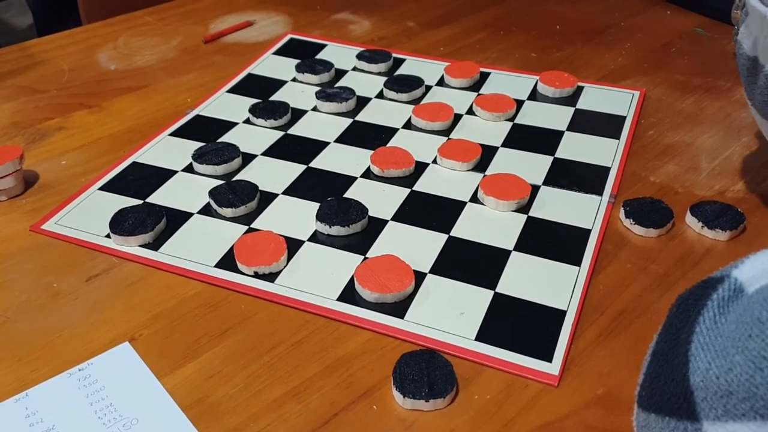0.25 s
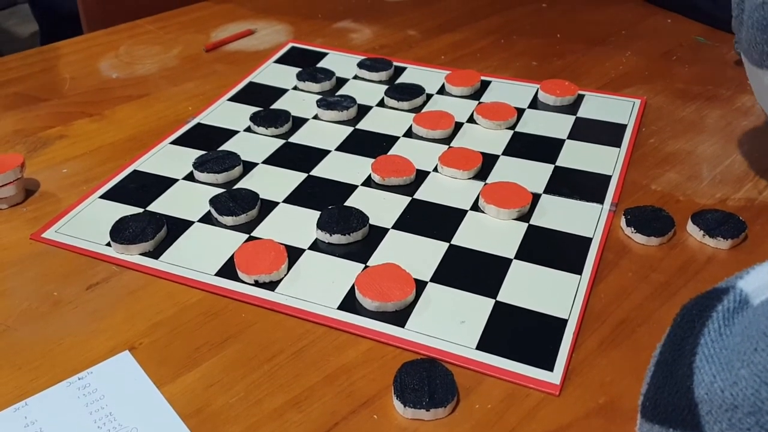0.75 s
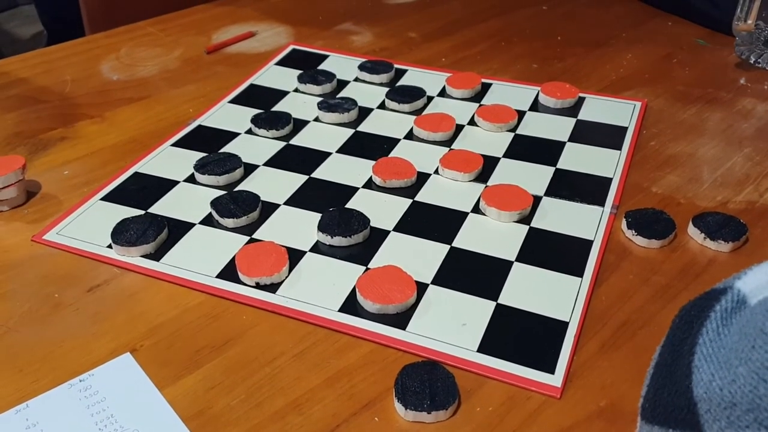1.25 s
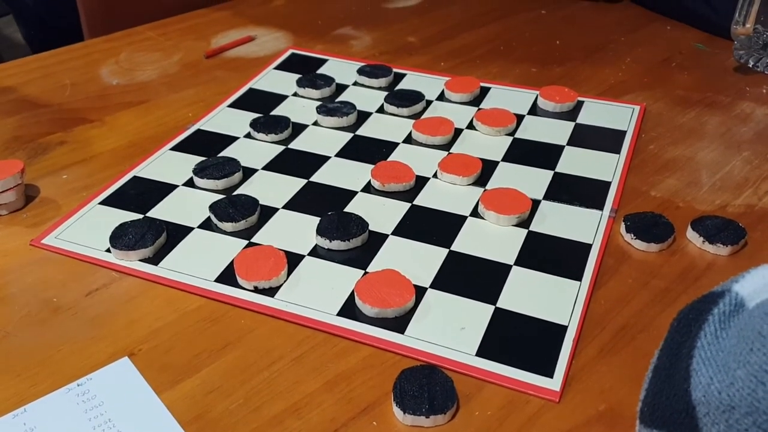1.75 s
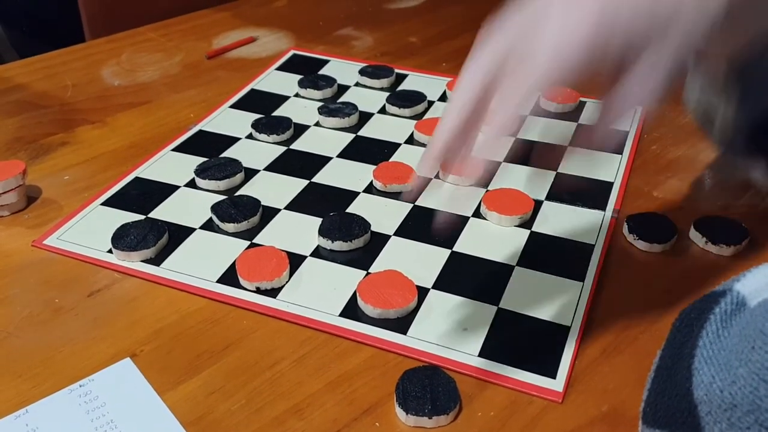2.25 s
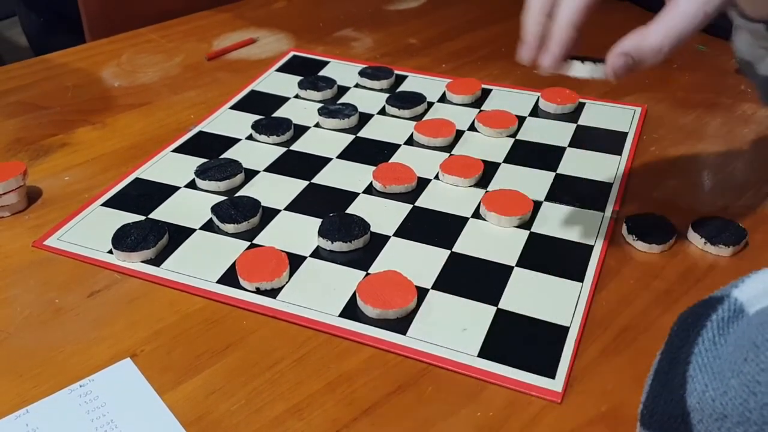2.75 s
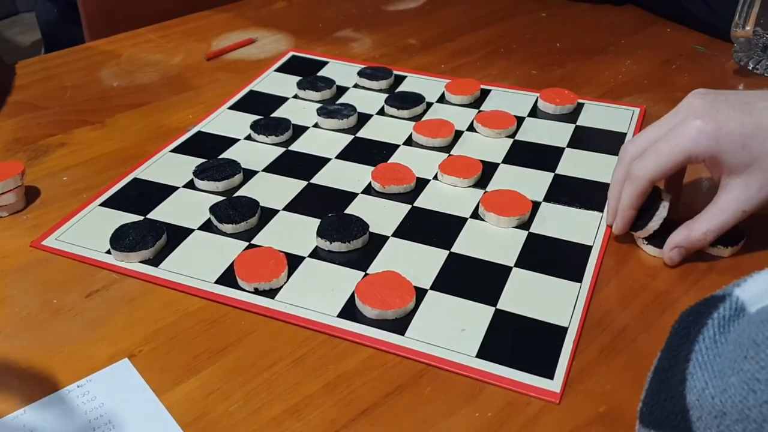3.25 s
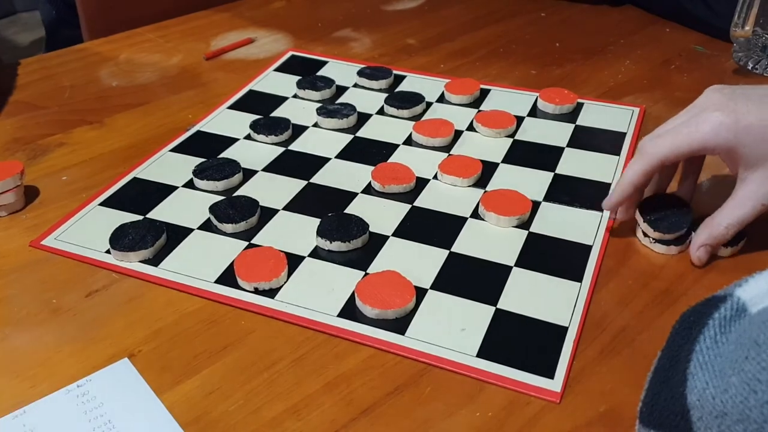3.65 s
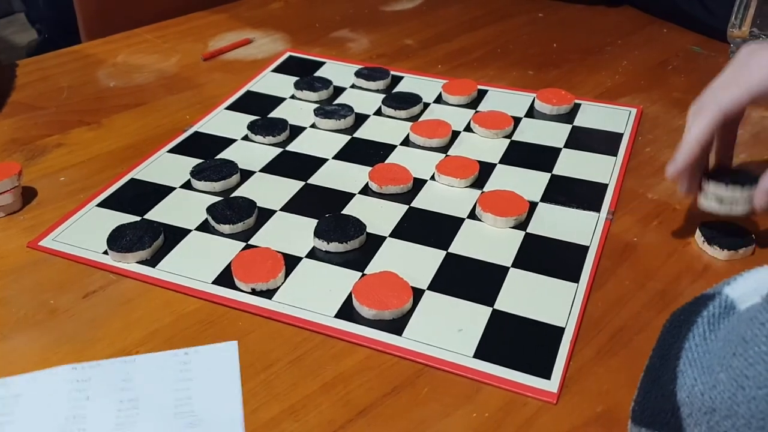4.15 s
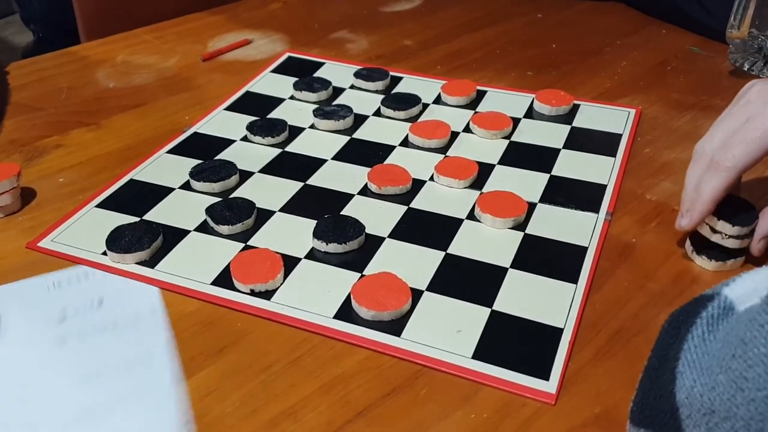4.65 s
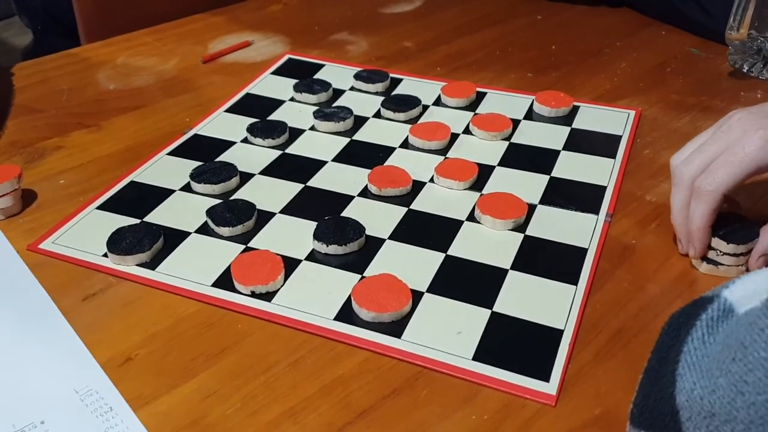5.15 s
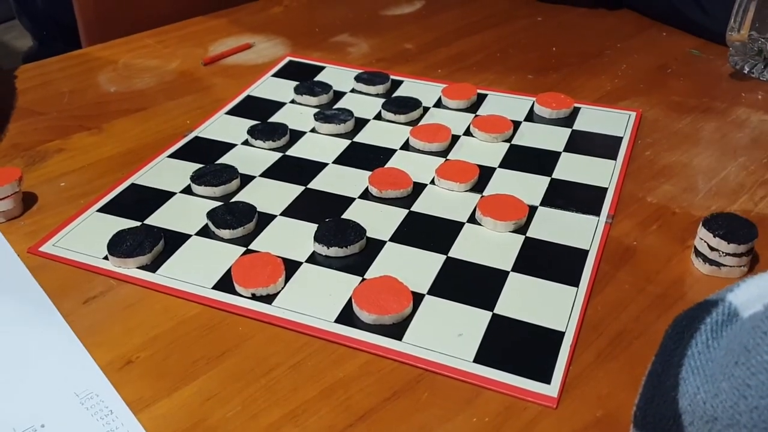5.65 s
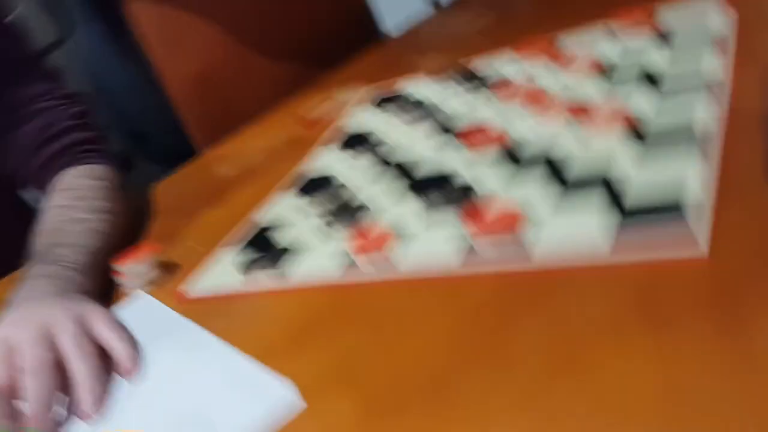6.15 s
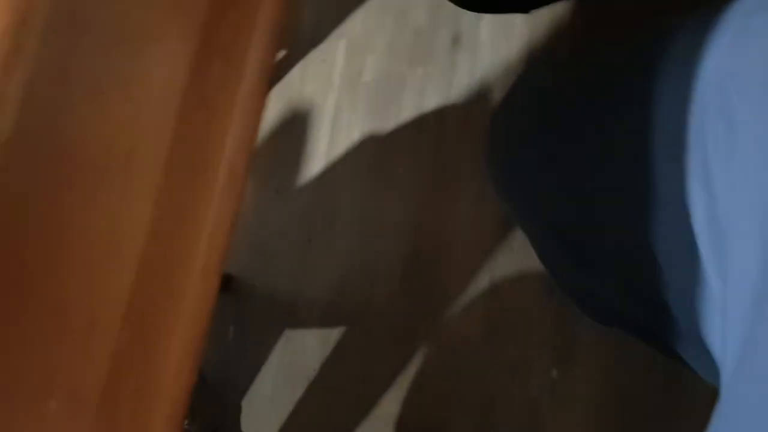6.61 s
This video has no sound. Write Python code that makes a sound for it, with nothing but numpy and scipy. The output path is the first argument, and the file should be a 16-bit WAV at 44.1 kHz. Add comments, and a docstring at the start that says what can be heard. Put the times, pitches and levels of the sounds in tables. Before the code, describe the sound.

Light wooden discs clack together and tap down on wood, followed by close paper crackling and loud, low handling bumps over faint room hum.

```python
"""A small living room: from the start, wooden draughts pieces ring as they click, slide and knock on the table.
Each is a noisy blow through resonances, heard direct and off the walls; low thuds ring the table's modes.
Then paper, loudest at the right microphone, crinkles: runs of snaps over random crackle in resonant patches.
Near the end fingers thump and rub the recorder's left port as pressure pulses, and the background sinks.
Beneath lie coloured room noise and hiss, brief very high hisses, and a low hum that fades shortly before the end."""
import sys
import numpy as np
from scipy import signal
from scipy.fft import rfft, irfft
from scipy.io import wavfile
from scipy.ndimage import uniform_filter1d

SR = 44100
rng = np.random.default_rng(int(sys.argv[2]) if len(sys.argv) > 2 else 0)


def transcribe(signal):
    """Save signal, clipped to [-1, 1], as a 16-bit WAV file at the path in sys.argv[1]."""
    frames = np.atleast_2d(signal).T
    limited = np.clip(frames, -1, 1)
    pcm = np.round(limited * 32767).astype(np.int16)
    wavfile.write(sys.argv[1], SR, pcm)


N = 303408
TIME = np.arange(N) / SR
BLOW_TIME = TIME[:4096]   # time within one blow [s]

# Levels and spectra are relative: the mix sets the final gain.
# disc against disc: (time [s], peak [dB], ring [Hz], twice the left-right difference [dB])
DISC_CLICKS = [(0.0818, -9.5, 3080, 17), (0.2098, -17, 3220, -25), (0.2143, -15.5, 3100, 9),
               (0.2515, -27, 3620, 2), (0.342, -34, 3100, 11), (0.352, -29, 4960, -14),
               (0.3662, -18.5, 1710, -27), (0.374, -13, 3670, 7), (0.3875, -23, 5030, -23),
               (0.428, -18.5, 2540, -33), (0.449, -14, 6000, -28), (0.4616, -16.5, 3620, -26),
               (0.469, -21.5, 5940, -13), (0.479, -20.5, 1640, -28), (0.51, -25.5, 5570, -23),
               (0.531, -23.5, 5710, -22), (0.6178, -9.5, 2570, -6), (0.9707, -20.5, 2300, -25),
               (0.9802, -19.5, 1490, -31), (1.1654, -27, 1840, -9), (1.74, -29.5, 3230, 2),
               (1.8821, -31.5, 4500, -8), (2.0649, -28, 3680, 39), (2.1012, -28.5, 3740, 26),
               (2.7053, -13, 5620, -23), (2.7353, -13.5, 6500, -18), (2.745, -13, 4160, -24),
               (2.755, -10.5, 6400, -22), (2.7623, -12.5, 3740, -18), (2.767, -8, 3940, -23),
               (2.7831, -14.5, 3780, -25), (3.102, -31, 2040, 27), (3.892, -36, 4670, -22)]
# spectrum of a disc blow: (frequency [Hz], level [dB])
DISC_SPECTRUM = [(300, 1), (900, 0), (1600, 7.5), (3000, 7), (6000, 11), (8000, 1), (11000, -13.5),
                 (16000, -43)]
# what a disc sends towards the walls: (frequency [Hz], level [dB])
DISC_OFF_AXIS = [(300, 9.5), (1500, 6.5), (3000, 2.5), (4500, -2), (6200, 0.5), (9000, -8.5), (16000, 21)]
FIRM_CLICK_DB = -9.5   # the shares below hold for a click this strong
CRACK_DB, CRACK_PER_DB = -3.5, -1.26   # light, glancing contacts are more crack than ring
TICK_DB, TICK_PER_DB = -43, 2.5   # the top tick grows faster than the click
CLICK_ROOM_DB, CLICK_ROOM_PER_DB = -9.5, -0.35   # faint clicks are farther off and wetter

# disc set down on the table or the stack: (time [s], peak [dB], brightness [Hz], wait until it drops flat [s])
SET_DOWNS = [(0.034, -36.5, 1460, 0.0027), (0.082, -40, 570, 0.0072), (0.329, -28, 1800, 0.013),
             (0.3726, -19.5, 3940, 0.004), (0.478, -32.5, 1680, 0.008), (0.836, -35.5, 1890, 0.0049),
             (0.89, -37, 1700, 0.0047), (0.969, -38, 1370, 0.01), (1.202, -36.5, 1160, 0.008),
             (1.619, -33, 2350, 0.016), (1.645, -34, 800, 0.006), (1.702, -34.5, 1710, 0.0078),
             (2.101, -34.5, 2300, 0.0037), (2.443, -32, 830, 0.0036), (2.521, -37, 730, 0.0093),
             (2.619, -39, 397, 0.005), (2.765, -20, 3650, 0.013), (3.029, -33.5, 890, 0.01),
             (3.101, -25, 1630, 0.017), (3.622, -21.5, 1310, 0.022), (3.873, -34, 1330, 0.0074),
             (4.028, -32, 570, 0.0027), (4.132, -37, 680, 0.0054), (4.199, -18, 800, 0.007),
             (4.556, -33, 660, 0.005), (4.585, -27, 970, 0.012), (5.196, -36.5, 730, 0.0027),
             (5.465, -22, 1180, 0.0073), (5.668, -41, 700, 0.006)]
# resonances of the knocked wood: (frequency [Hz], width [Hz], level [dB])
WOOD_MODES = [(583, 46, -3), (656, 105, 0.5), (715, 190, -3), (1027, 100, -3.5), (1470, 430, -11),
              (1722, 134, 1), (2010, 600, -9.5), (2590, 210, -7.5), (3120, 720, -9.5), (4040, 180, -2),
              (4060, 150, -9)]
FLAT_DB, FLAT_BRIGHTNESS = -8.5, 0.65   # level and brightness ratio of the drop flat, against the first touch
TOUCH_ROOM_DB, FLAT_ROOM_DB = -5, 1

# disc pushed across the wood: (start [s], end [s], level [dB])
DISC_SLIDES = [(0.0, 0.06, -57.5), (0.33, 0.50, -59.5), (0.81, 0.87, -55), (0.96, 1.13, -55.5),
               (1.15, 1.29, -56), (1.29, 1.44, -61.5), (1.59, 1.76, -56.5), (1.96, 2.0, -60.5),
               (3.03, 3.10, -56), (4.55, 4.62, -65), (5.46, 5.52, -60)]

# low thuds of the table, some under the disc knocks: (time [s], peak [dB], pitch [Hz])
TABLE_THUDS = [(0.084, -37, 44.8), (0.611, -38.5, 55.3), (1.082, -35, 112), (2.388, -33.5, 132),
               (2.621, -37, 413), (2.762, -33, 550), (3.117, -35.5, 520), (3.289, -42.5, 220),
               (3.639, -30.5, 526), (4.125, -33, 181), (4.431, -36.5, 124), (4.493, -30, 114),
               (4.57, -37, 119), (5.075, -26.5, 202), (5.197, -37, 96.9), (5.465, -31, 326),
               (5.524, -26.5, 160), (5.763, -31.5, 108)]
# low modes of the table top: (frequency [Hz], width [Hz], level [dB])
TABLE_MODES = [(50, 9, -5), (129.6, 23, 4.5), (242.3, 46, -4.5), (279, 124, -4.5), (344, 119, -5.5),
               (541, 30, -6.5)]

# paper creases buckling: (time [s], first peak [dB], ring [Hz], snaps, gap [s], change per snap [dB])
PAPER_CREASES = [(4.251, -30.5, 5200, 2, 0.013, 2), (4.3226, -17, 5750, 2, 0.016, -14),
                 (4.376, -19, 3900, 2, 0.0147, -4), (4.5027, -28, 5570, 1, 0, -3),
                 (4.584, -27, 4300, 2, 0.018, -2), (4.6554, -22, 5400, 3, 0.0102, 3.5),
                 (4.815, -33.5, 5770, 2, 0.0144, 6.5), (4.8813, -23.5, 4930, 1, 0, -4),
                 (4.9014, -6.5, 3980, 3, 0.0054, -4), (5.041, -19, 3220, 3, 0.01, -2.5),
                 (5.0899, -6.5, 4860, 3, 0.0053, -2.5), (5.1497, -22, 4500, 2, 0.023, -1.5),
                 (5.249, -28, 4540, 1, 0, 0), (5.306, -20.5, 5090, 1, 0, -2),
                 (5.3518, -15.5, 4860, 2, 0.011, -1), (5.486, -23, 3540, 2, 0.0085, 2.5),
                 (5.5454, -16.5, 5500, 5, 0.0073, 0), (5.5891, -15, 4200, 1, 0, 0),
                 (5.7135, -20, 5700, 1, 0, 0), (5.783, -18.5, 4630, 2, 0.0084, 7.5),
                 (5.816, -17.5, 5300, 2, 0.0055, 0.5), (5.9126, -19, 5460, 1, 0, 0),
                 (5.982, -26, 5530, 1, 0, 0), (6.0156, -13.5, 5500, 4, 0.0099, 0.5),
                 (6.198, -23, 5640, 3, 0.0076, -0.5), (6.2441, -27, 3410, 1, 0, 0),
                 (6.2786, -16.5, 5530, 3, 0.0067, -0.8)]
# paper flexing: (start [s], end [s], level [dB])
PAPER_FLEXES = [(4.335, 4.422, -44), (4.662, 4.703, -37.5), (4.803, 4.943, -40.5), (5.043, 5.198, -37.5),
                (5.345, 5.385, -35.5), (5.455, 5.606, -39), (5.718, 5.779, -45.5), (5.783, 5.848, -36),
                (5.9, 5.998, -41.5), (6.016, 6.053, -38), (6.194, 6.316, -45.5), (6.42, 6.441, -50.5),
                (6.76, 6.83, -60.5)]
# spectrum of a paper snap: (frequency [Hz], level [dB])
PAPER_SPECTRUM = [(300, -37.5), (800, -18), (1350, -8), (2400, -13), (3200, -4), (4700, 2.5), (6100, 5.5),
                  (7500, -2), (9500, -8.5), (13500, -13), (15500, -23), (16500, -36)]
# patches of the sheet: (frequency [Hz], width [Hz], level [dB])
PAPER_PATCHES = [(3000, 150, 3.5), (3920, 1200, 5), (4750, 350, -2.5), (5080, 270, -2), (5460, 630, -21),
                 (6700, 3900, 9.5), (7780, 210, 0.5), (12000, 1600, -1)]
SNAP_CRACK_DB, SNAP_PITCH_SPREAD = -6.5, 0.027   # broad crack of each snap; share by which its ring varies

# fingers on the left port: (time [s], push level [dB], brightness [Hz], scuff [s], rub against push [dB])
PORT_BUMPS = [(6.0008, 1, 1020, 0.0041, -41), (6.177, 0.5, 2000, 0.0028, -6), (6.18, 2, 1070, 0.00082, -41),
              (6.2502, -15, 650, 0.019, -4.5), (6.2611, 3, 760, 0.012, -19),
              (6.334, -17.5, 211, 0.014, -13), (6.388, -22, 248, 0.047, -2),
              (6.3967, -21, 2430, 0.00025, 13.5), (6.419, -22.5, 130, 0.01, -20),
              (6.546, -17.5, 4060, 0.0025, -9), (6.577, -17.5, 296, 0.016, -16),
              (6.607, -24, 200, 0.0027, -19), (6.648, -21.5, 333, 0.00073, -7),
              (6.6656, -21.5, 1550, 0.0013, 0.5)]
# grip rumble on the recorder: (time [s], level [dB])
GRIP_LEVEL = [(5.95, -58), (6.224, -37.5), (6.5, -45), (6.636, -46.5), (6.76, -66), (6.88, -50.5)]
# how the port takes a push: (frequency [Hz], level [dB])
PORT_SPECTRUM = [(15, -37), (40, 3.5), (85, 3.5), (160, 4), (400, -3), (900, -0.5), (2500, -5), (16000, 16)]
# rubbing fingers: (frequency [Hz], level [dB])
RUB_SPECTRUM = [(500, 3.5), (2000, 1), (4000, -3.5), (7000, -20), (16000, -39)]
SCUFF_DB, SCUFF_REFERENCE_S = 1, 0.01   # scuffing against the clean press, for a scuff of the reference length

# reverberation: (frequency [Hz], 60 dB decay time [s])
ROOM_DECAY = [(100, 0.53), (500, 0.41), (2500, 0.4), (6000, 0.37), (14000, 0.21)]
# left port facing away: (frequency [Hz], gain [dB])
LEFT_PORT_SHADE = [(100, 1), (3000, 3.5), (4500, 3.5), (6000, -8.5), (8000, -20.5), (11000, -3.5),
                   (16000, -17.5)]

# brief very high hisses, the early ones trailing after firm clicks: (middle [s], half length [s], level [dB])
HIGH_HISSES = [(0.13, 0.088, -59), (0.676, 0.12, -58), (1.14, 0.16, -64), (3.216, 0.066, -58.5),
               (3.763, 0.09, -58), (4.18, 0.1, -57.5), (4.29, 0.082, -55.5), (4.75, 0.65, -52.5),
               (5.575, 0.048, -66), (5.884, 0.14, -52), (6.237, 0.098, -58.5), (6.531, 0.046, -54)]
# spectrum of the very high hiss: (frequency [Hz], level [dB])
TOP_HISS_SPECTRUM = [(5000, 2), (8500, -11.5), (12000, -7.5), (15500, -16), (17000, -69)]
# room noise over time: (time [s], level [dB])
ROOM_NOISE_LEVEL = [(0.0, -50.5), (0.4, -46), (1.59, -50.5), (3.98, -50), (4.43, -48.5), (5.27, -52),
                    (6.29, -45.5), (6.51, -54), (6.63, -59), (6.88, -72.5)]
# spectrum of the room noise: (frequency [Hz], level [dB])
ROOM_NOISE_SPECTRUM = [(25, -39), (45, -4), (62, -9), (81, -5), (100, -9.5), (130, -4.5), (165, -10.5),
                       (220, -8.5), (330, -14), (560, -20), (1100, -26), (2700, -24.5), (3400, -36),
                       (7000, -53)]
# treble hiss over time: (time [s], level [dB])
TREBLE_HISS_LEVEL = [(0.0, -54), (0.48, -57), (0.67, -53), (1.57, -60), (1.82, -58), (2.32, -69),
                     (2.63, -59), (2.95, -55), (3.37, -65), (4.16, -64), (4.37, -57), (4.62, -46),
                     (4.98, -40.5), (5.36, -39.5), (5.96, -42.5), (6.15, -42.5), (6.76, -59.5), (6.88, -73)]
# spectrum of the treble hiss: (frequency [Hz], level [dB])
TREBLE_HISS_SPECTRUM = [(2000, -22), (3500, -16.5), (5500, -8), (7000, -16.5), (9000, -30.5), (16000, -40)]
ROOM_NOISE_DB, HISS_DB, TOP_FLOOR_DB = -0.5, -11, -75
HUM_HZ, HUM_DB, HUM_END_S, HUM_FADE_S = 82.7, -51.5, 6.69, 0.13
CUTOFF_HZ = 16500


def from_db(db):
    """Decibels to gain."""
    return 10 ** (np.asarray(db) / 20)


def rms_one(x):
    """Scale to rms 1."""
    return x / np.sqrt(np.mean(x ** 2) + 1e-20)


def unit(x):
    """Scale each channel to energy 1."""
    return x / np.sqrt(np.sum(x ** 2, axis=-1, keepdims=True) + 1e-20)


def peak_one(x):
    """Scale each channel of a blow so that its envelope tops at 1."""
    envelope = uniform_filter1d(np.abs(signal.hilbert(x)) ** 2, size=24, axis=-1)
    return x / np.sqrt(envelope.max(axis=-1, keepdims=True) + 1e-20)


def level_in_time(rows):
    """A level curve, read at every sample."""
    s, db = np.transpose(rows)
    return np.interp(TIME, s, db)


def at_hz(points, hz):
    """Read a table on a log-frequency axis."""
    f, value = np.transpose(points)
    return np.interp(np.log(hz + 1e-3), np.log(f), value)


def fade(t, t60):
    """Exponential decay by 60 dB in t60 seconds."""
    return np.exp(-np.log(1000) * t / max(t60, 1e-4))


def colour(x, spectrum, size=4096):
    """Causal, minimum-phase filter with the given spectrum."""
    gain = from_db(at_hz(spectrum, np.fft.rfftfreq(size, 1 / SR)))
    cepstrum = irfft(np.log(gain))
    folded = np.r_[cepstrum[0], 2 * cepstrum[1:size // 2]]
    kernel = irfft(np.exp(rfft(folded, size)))[:size // 2]
    return signal.oaconvolve(np.atleast_2d(x), kernel[None], axes=1)[:, :x.shape[-1]]


def resonate(x, hz, width):
    """One resonance with gain 1 on top."""
    r = np.exp(-np.pi * width / SR)
    zeros = np.array([1, 0, -1]) * (1 - r * r) / 2
    poles = [1, -2 * r * np.cos(2 * np.pi * hz / SR), r * r]
    return signal.lfilter(zeros, poles, x + 1e-18)


def soften(x, hz, order=2):
    """Low-pass."""
    low_pass = signal.butter(order, min(hz, SR / 2 - 1000), fs=SR, output="sos")
    return signal.sosfilt(low_pass, x + 1e-18)


def body(x, modes, spread_db):
    """Each blow excites the modes with strengths of its own."""
    total = 0
    for k, (hz, width, db) in enumerate(modes):
        strength = (-1) ** k * from_db(db + spread_db * rng.normal())
        total = total + strength * resonate(x, hz, width)
    return total


def contact(scatter_db, t60):
    """An impulse and its quickly dying scatter, different at each microphone."""
    noise = rng.standard_normal((2, len(BLOW_TIME)))
    force = from_db(scatter_db) * unit(noise * fade(BLOW_TIME, t60))
    force[:, 0] += 1
    return force


def strokes(spans, size):
    """Gain of a list of strokes, their edges smoothed over size samples."""
    gain = sum(from_db(db) * ((TIME > start) & (TIME < end)) for start, end, db in spans)
    return uniform_filter1d(gain, size=size)


def grains(per_s, spread_db):
    """Clicks at random moments, a few much larger than the rest."""
    happens = rng.random(N) < per_s / SR
    size = from_db(spread_db * np.minimum(rng.exponential(1, N), 4))
    return happens * size * rng.choice([-1, 1], N)


def add(out, s, sound, lag=0):
    """Mix a stereo sound in at s; the left side comes lag seconds later."""
    for side, start in enumerate([s + lag, s]):
        i = int(start * SR)
        out[side, i:i + sound.shape[1]] += sound[side, :N - i]


def panned(db):
    """Left and right gains, db apart, of rms 1 together."""
    gains = from_db([[db / 2], [-db / 2]])
    return rms_one(gains)


def disc_clicks():
    """A hard contact rings a disc for a few cycles; its edge cracks, and a fine tick grows with firmness."""
    near, far = np.zeros((2, 2, N))
    for s, db, hz, pan in DISC_CLICKS:
        firmness = db - FIRM_CLICK_DB
        force = colour(contact(scatter_db=-4.5, t60=0.018), DISC_SPECTRUM)
        ring = unit(resonate(force, hz, 0.18 * hz))
        crack = from_db(CRACK_DB + CRACK_PER_DB * firmness) * unit(force)
        click = from_db(db) * peak_one(ring + crack)
        snick = resonate(soften(contact(scatter_db=47, t60=0.0032), 10000, order=4), 12600, 5900)
        tick_gain = from_db(TICK_DB + TICK_PER_DB * firmness)
        tick = tick_gain * rms_one(resonate(snick, 12500, 7000)) * panned(-5)
        add(near, s, click * panned(pan / 2) + from_db(-5.5) * tick, lag=0.00013)
        # the walls get the ring and the broad crack
        spread = from_db(-3.5) * resonate(click, hz, 0.75 * hz) + from_db(db - 5) * peak_one(force)
        room_gain = from_db(CLICK_ROOM_DB + CLICK_ROOM_PER_DB * firmness)
        add(far, s, spread * room_gain + from_db(-15.0) * tick)
    return near, colour(far, DISC_OFF_AXIS)


def knock(db, hz):
    """One touch of a disc on wood; the lower its brightness, the duller the wood rings."""
    force = contact(scatter_db=12, t60=0.04)
    modes = unit(body(force, WOOD_MODES, spread_db=3.5))
    wood = modes + from_db(-4.5) * unit(resonate(force, hz, 0.67 * hz))
    rim = unit(resonate(soften(force, 4900), 3900, 1600))
    mix = unit(soften(wood, 2.32 * hz)) + from_db(-15.0) * rim
    return from_db(db) * peak_one(mix) * panned(-4.5)


def table_knocks():
    """A disc lands on its rim, then drops flat with a weaker, duller knock."""
    near, far = np.zeros((2, 2, N))
    for s, db, hz, drop_s in SET_DOWNS:
        touch = knock(db, hz)
        flat = knock(db + FLAT_DB, hz * FLAT_BRIGHTNESS)
        for start, sound, room_db in [(s, touch, TOUCH_ROOM_DB), (s + drop_s, flat, FLAT_ROOM_DB)]:
            add(near, start, sound, lag=0.00022)
            add(far, start, sound * from_db(room_db))
    return near, far


def slides():
    """The grain of the wood catches and slips as a disc is pushed along."""
    slips = np.array([grains(per_s=400, spread_db=4.5) for side in range(2)])
    texture = rms_one(soften(resonate(slips, 930, 800), 3600))
    scrape = strokes(DISC_SLIDES, size=900) * texture
    return from_db(3.5) * scrape, scrape


def table_thuds():
    """A soft blow rings the low modes of the table top."""
    out = np.zeros((2, N))
    for s, db, hz in TABLE_THUDS:
        force = contact(scatter_db=12.5, t60=0.055)[0]
        thud = resonate(body(force, TABLE_MODES, spread_db=2), hz, 2 * hz)
        add(out, s, from_db(db) * peak_one(thud) * panned(1.4))
    return out, from_db(-0.5) * out


def paper_snaps():
    """Creases buckle in runs of sharp snaps, each a ring and a broad crack."""
    snaps = np.zeros((2, N))
    for s, db, crease_hz, count, gap_s, step_db in PAPER_CREASES:
        for k in range(int(round(count))):
            hz = crease_hz * np.exp(SNAP_PITCH_SPREAD * rng.normal())
            buckle = contact(scatter_db=15, t60=0.01)
            shiver = contact(scatter_db=12, t60=0.035)
            force = colour(buckle + from_db(-3) * shiver, PAPER_SPECTRUM)
            ring = unit(resonate(force, hz, 0.09 * hz))
            snap = peak_one(from_db(-12.5) * ring + from_db(SNAP_CRACK_DB) * unit(force))
            add(snaps, s + k * gap_s, from_db(db + k * step_db) * snap, lag=-0.0002)
    return snaps


def paper_crackle():
    """Patches of different size crackle at random moments while the sheet flexes."""
    crackle = 0
    for hz, width, db in PAPER_PATCHES:
        flick = contact(scatter_db=4, t60=0.003)
        crease = unit(resonate(colour(flick, PAPER_SPECTRUM), hz, width))[:, :SR // 100]
        flicks = [grains(per_s=75, spread_db=4.5)]
        crackle = crackle + from_db(db) * signal.oaconvolve(flicks, crease, axes=1)[:, :N]
    return strokes(PAPER_FLEXES, size=400) * rms_one(crackle)


def paper():
    """Snaps and crackle of one sheet, louder at the right microphone."""
    sheet = paper_snaps() + from_db(3.0) * paper_crackle()
    return sheet * panned(-7.5), from_db(-8.5) * sheet


def port_bumps():
    """Fingers press and rub on the left port: pressure pulses with a slow rebound."""
    out = np.zeros((2, N))
    for s, db, hz, scuff_s, rub_db in PORT_BUMPS:
        # a longer scuff holds more energy
        scatter_db = SCUFF_DB + 10 * np.log10(scuff_s / SCUFF_REFERENCE_S)
        follow_through = from_db(-14) * unit(fade(BLOW_TIME, 0.0046))   # of the soft fingertip
        force = contact(scatter_db, t60=3 * scuff_s)[0] + follow_through
        push = soften(colour(force, PORT_SPECTRUM), hz, order=3)
        rub = colour(contact(scatter_db=40, t60=4 * scuff_s)[0], RUB_SPECTRUM)
        bump = push / np.abs(push).max() + from_db(rub_db) * rub / np.abs(rub).max()
        add(out, s, from_db(db) * bump * from_db([[0], [-36]]))
    return out


def grip():
    """Rumble and friction of the hand on the recorder, far stronger at the left."""
    onset = np.clip((TIME - GRIP_LEVEL[0][0]) / 0.076, 0, 1)
    strength = from_db(level_in_time(GRIP_LEVEL)) * onset
    rumble = rms_one(soften(colour(rng.standard_normal(N), PORT_SPECTRUM), 233))
    friction = rms_one(resonate(rng.standard_normal(N), 450, 750))
    return strength * (rumble + from_db(-13) * friction) * from_db([[3], [-16]])


def room(x, gap_s):
    """Diffuse tail after the first wall echo, dying faster in the treble, alike on both sides in the bass."""
    t, tail = TIME[:SR // 2], 0
    edges = np.geomspace(30, 18000, 11)
    for low, high in zip(edges, edges[1:]):
        hz = np.sqrt(low * high)
        band = signal.butter(2, [low, high], "band", fs=SR, output="sos")
        mid, side = signal.sosfilt(band, rng.standard_normal((2, len(t))))
        alike = 1 / (1 + (hz / 900) ** 2)
        stereo = np.sqrt(1 + alike) * mid + np.sqrt(1 - alike) * side * [[1], [-1]]
        tail = tail + stereo * fade(t, at_hz(ROOM_DECAY, hz))
    tail = tail * (1 - np.exp(-(t / gap_s) ** 2))
    tail = tail * (1 + 2.2 * fade(t, 0.053))   # near walls answer strongest
    return signal.oaconvolve(x, unit(tail), axes=1)[:, :N]


def stereo_noise(spectrum):
    """Diffuse noise, mostly alike at both microphones in the bass; rms 1."""
    mid, side = rng.standard_normal((2, N))
    side = colour(side, [(60, -7.5), (300, -15), (1000, -1), (16000, 0)])
    return rms_one(colour(mid + side * [[1], [-1]], spectrum))


def high_hisses():
    """Brief very high hisses swell and fade, mostly at the right, over a faint steady one."""
    swell = sum(from_db(db) * np.exp(-((TIME - s) / half_s) ** 2) for s, half_s, db in HIGH_HISSES)
    return (swell + from_db(TOP_FLOOR_DB)) * stereo_noise(TOP_HISS_SPECTRUM) * panned(-28)


def narrow_noise(hz, width):
    """Noise through the same resonance twice, a wavering tone; rms 1."""
    once = resonate(rng.standard_normal(N), hz, width)
    return rms_one(resonate(once, hz, width))


def background():
    """Room noise, a wavering appliance hum that fades shortly before the end, and a hiss that swells and sinks."""
    air_gain = from_db(level_in_time(ROOM_NOISE_LEVEL) + ROOM_NOISE_DB)
    air = air_gain * stereo_noise(ROOM_NOISE_SPECTRUM)
    hiss_gain = from_db(level_in_time(TREBLE_HISS_LEVEL) + HISS_DB)
    hiss = hiss_gain * stereo_noise(TREBLE_HISS_SPECTRUM) * panned(-9.0)
    steady = np.sin(2 * np.pi * HUM_HZ * TIME)
    hum = from_db(HUM_DB) * (1.1 * steady + 0.45 * narrow_noise(HUM_HZ, 4.5))
    drone = from_db(-59.5) * narrow_noise(219.4, 30)   # a mode of the room
    fade_out = np.clip((HUM_END_S - TIME) / HUM_FADE_S, 0, 1)
    return air + hiss + (hum + drone) * fade_out


def scene():
    """Each source gives a direct sound and a share for the room; the left port, facing away, loses top treble."""
    sources = [disc_clicks(), table_knocks(), slides(), table_thuds(), paper()]
    direct, to_walls = map(sum, zip(*sources))
    left, right = direct + room(to_walls, gap_s=0.0017)
    heard = np.vstack([colour(left, LEFT_PORT_SHADE), right])
    return heard + port_bumps() + grip() + high_hisses() + background()


def record(dry):
    """Peaks are clipped just under full scale, then the top is cut."""
    top_cut = signal.ellip(10, 0.2, 80, CUTOFF_HZ, fs=SR, output="sos")
    return signal.sosfilt(top_cut, np.clip(dry, -0.92, 0.92))


dry = scene()
out = record(dry)
transcribe(out)
```